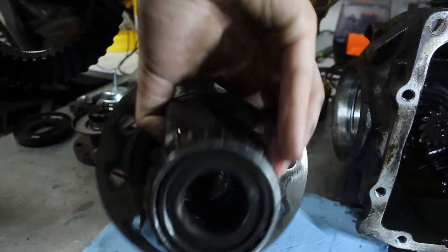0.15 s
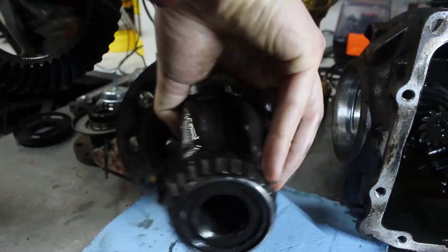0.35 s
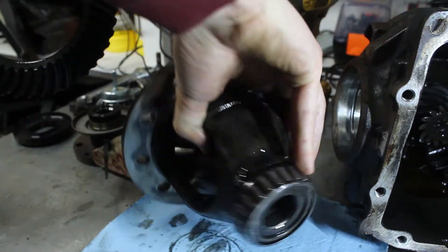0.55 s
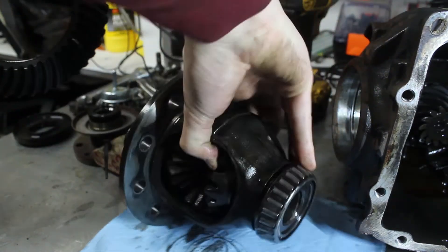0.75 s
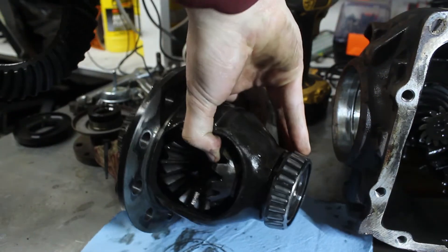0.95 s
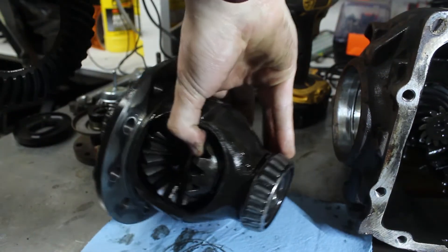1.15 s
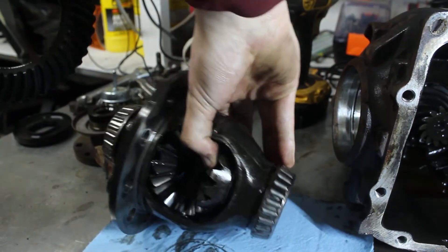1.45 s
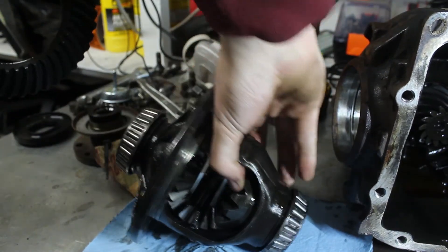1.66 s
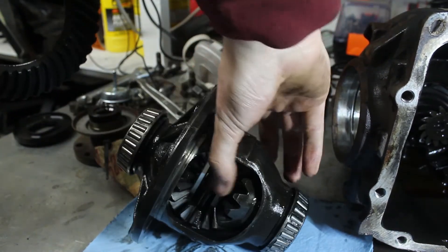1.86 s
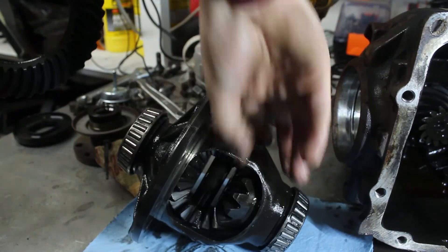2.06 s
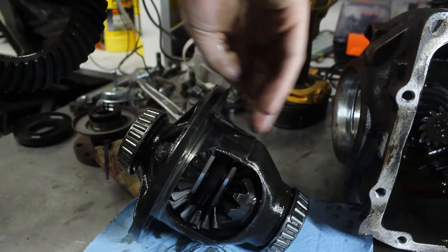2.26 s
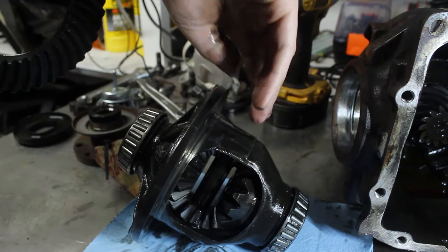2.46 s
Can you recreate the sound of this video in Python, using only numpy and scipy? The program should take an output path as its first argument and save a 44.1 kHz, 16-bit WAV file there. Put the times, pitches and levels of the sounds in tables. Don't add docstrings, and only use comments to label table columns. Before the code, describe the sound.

A heavy metal gear carrier is put down on a workbench. Only faint microphone hiss, hum and thin whines until 0.8 s, then a quick cluster of dull knocks with metallic clatter to 1.0 s. Small ticks follow, a second double thud at 1.4 s, and the loudest clunk at 1.72 s, with rattling gears. A tiny squeak near 1.97 s leads into soft skin rubbing, fading in the short room echo.

```python
import sys
import numpy as np
from scipy import signal
from scipy.fft import rfft, irfft, next_fast_len
from scipy.io import wavfile
from scipy.ndimage import map_coordinates

SR = 44100
rng = np.random.default_rng(int(sys.argv[2]) if len(sys.argv) > 2 else 0)


def to_wav(sig):
    pcm = np.clip(np.atleast_2d(sig), -1, 1) * 32767
    pcm = np.round(pcm).astype(np.int16)
    wavfile.write(sys.argv[1], SR, pcm.T)


def volts_from_decibels(level):
    exponent = np.asarray(level, float) / 20
    return 10 ** exponent


N = 114660

BRIGHT_WET_DB = -5
ATTACK_S = 0.0005


def unit(x):
    return x / np.sqrt(np.mean(x ** 2) + 1e-20)


def along(points, hz):
    f, v = np.transpose(points)
    return np.interp(np.log(hz + 1), np.log(f + 1), v)


def noise(n, response):
    m = next_fast_len(n + SR // 5)
    spectrum = rfft(rng.standard_normal(m)) * response(np.fft.rfftfreq(m, 1 / SR))
    return unit(irfft(spectrum, m)[:n])


def peak(f, center_hz, width_hz):
    return 1j * f * width_hz / (center_hz ** 2 - f * f + 1j * f * width_hz)


def wobble(n, rate_hz):
    return map_coordinates(rng.standard_normal(n // 20 + 9), [np.arange(n) * rate_hz / SR])


def add(track, start_s, x):
    spot = track[round(start_s * SR):][:len(x)]
    spot += x[:len(spot)]


def shop(x, wet_db):
    # (frequency [Hz], t60 [s])
    shop_t60 = [(70, 0.36), (250, 0.57), (1000, 0.5), (3000, 0.48), (8000, 0.12), (14000, 0.23)]
    first_wall_s = 0.006
    hz, t, z = signal.stft(rng.standard_normal(SR * 3 // 4), SR, nperseg=512)
    decay = volts_from_decibels(-60 * t / along(shop_t60, hz)[:, None])
    tail = signal.istft(z * decay, SR, nperseg=512)[1]
    tail = np.pad(tail / np.linalg.norm(tail), (round(first_wall_s * SR), 0)) * volts_from_decibels(wet_db)
    tail[0] = 1
    return signal.fftconvolve(x, tail)


def mic_noise():
    # (frequency [Hz], density [dB per Hz])
    hiss_color = [(15, -41), (25, 6), (86, -8.5), (118, -2.5), (181, -12), (515, -16.5), (1120, -18.5),
                  (6900, -27), (15000, -37)]
    # (frequency [Hz], width [Hz], level [dB])
    whines = [(119, 14, -69), (6900, 130, -72), (9700, 130, -78), (10900, 220, -76), (13000, 100, -81),
              (13800, 100, -81)]
    out = volts_from_decibels(-51 + 0.57 * wobble(N, 5.84)) * noise(N, lambda f: volts_from_decibels(along(hiss_color, f)))
    for center_hz, width_hz, db in whines:
        swell = volts_from_decibels(db + 1.2 * wobble(N, 9.8))
        out += swell * noise(N, lambda f: peak(f, center_hz, width_hz) ** 2)
    return out


def bench():
    # (time [s], level [dB], contact [ms], leg shake [dB], ring share of full t60)
    thuds = [(0.796, -40, 4.5, 16.5, 0.27), (.815, -24, 0.94, -7, 0.41), (0.8764, -19, 1.47, -14.5, 0.28),
             (0.888, -24, 1.1, -13, 0.16), (0.937, -26.5, 0.96, -2, 0.16), (0.949, -21, 1.17, -19, 0.13),
             (0.999, -33, 1.8, -0.5, 0.16), (1.156, -39, 1.8, 1, .4), (1.183, -41, 2.3, -7, 0.13),
             (1.38, -33, 2.7, 11.5, 0.53), (1.3976, -19.5, 0.86, -7, 0.28), (1.43, -26, 1.8, -0.5, 0.21),
             (1.4594, -20.5, 1.25, -15, 0.2), (1.484, -35.5, 1.9, 9, 0.7), (1.50, -45, 1, -6, .3),
             (1.719, -19, 1.5, -6, 0.35), (1.7237, -5.5, 1.46, -6.5, 0.29), (1.764, -33, 0.95, 3, 0.2),
             (1.795, -29, 2.5, -22, 0.24), (1.817, -42, 2.8, -4, 0.64), (1.924, -30, 0.94, -6, 0.14),
             (1.301, -43, 2.1, -8, 0.34), (1.655, -37, 1.2, -11, 0.46)]
    # (frequency [Hz], level [dB], t60 [s])
    bench_modes = [(171, -24, 0.46), (221.4, -6, 0.34), (250.6, -0.5, 0.23), (325.4, 3.5, 0.17),
                   (386.6, -9, 0.38), (463, -5, 0.204), (518, -5.5, 0.28), (672, -14, 0.28),
                   (877, -4.5, 0.32), (1064, 0, 0.11), (1060, -4.5, 0.28), (1405, -18, .2)]
    scatter_db, detune = 2.5, 0.03
    legs_hz, legs_base_db, legs_t60_s = 72.8, -8, 0.14
    spread_s = 0.001
    board = signal.butter(3, 154, "high", fs=SR, output="sos")
    out, t = np.zeros(N), np.arange(SR // 2) / SR
    mode_hz, mode_db, mode_t60_s = np.array(bench_modes).T[:, :, None]
    for start_s, db, contact_ms, legs_db, share in thuds:
        level_draw, pitch_draw = rng.standard_normal((2, len(mode_hz), 1))
        decay = volts_from_decibels(mode_db + scatter_db * level_draw - 60 * t / (mode_t60_s * share))
        tones = np.sin(2 * np.pi * mode_hz * (1 + detune * pitch_draw) * t)
        ring = np.sum(decay * tones, 0) * (1 - np.exp(-t / spread_s))
        push = np.sin(np.pi * np.clip(t[:SR // 50] * 1000 / contact_ms, 0, 1))
        knock = signal.sosfilt(board, signal.fftconvolve(ring, push)[:len(t)])
        knock /= np.abs(knock).max()
        legs = volts_from_decibels(legs_base_db + legs_db - 60 * t / legs_t60_s) * np.sin(2 * np.pi * legs_hz * t)
        add(out, start_s, -volts_from_decibels(db) * shop(knock + legs, -6))
    return out


def gears():
    # (time [s], level [dB], rattle length [s], t60 [s], tilt [dB per octave])
    jolts = [(0.801, -36, 0.033, 0.029, 0.6), (0.8763, -25.5, 0.004, 0.07, -3.5),
             (0.896, -50.5, 0.031, 0.11, 5), (0.937, -36.5, 0.014, .08, -2.5),
             (0.984, -51.5, 0.091, 0.15, 1.5), (1.397, -30.5, 0.011, 0.06, -3.16),
             (1.441, -40, 0.039, 0.078, -5.5), (1.7278, -21, 0.014, .12, -2.2),
             (1.7882, -31, .004, 0.064, -1.9), (1.805, -45.5, .006, 0.2, 0.8),
             (1.948, -43.5, 0.02, .06, -5), (2.0, -58, 0.12, .2, 2), (2.122, -48.5, 0.019, 0.16, -0.9)]
    # (frequency [Hz], density [dB per Hz])
    clatter = [(350, -2), (600, -7), (1220, -15.5), (1390, -14), (1910, -19), (2400, -19.5), (3420, -23.5),
               (9890, -26), (15500, -47)]
    lumps_per_s, lumps_db = 500, 1.8
    crack_db, crack_t60_s = -7.5, 0.023
    out, t = np.zeros(N), np.arange(SR // 3) / SR

    def color(f, tilt_db):
        tilted = volts_from_decibels(along(clatter, f) + tilt_db * np.log2(f / 3000 + 0.055))
        return tilted * f ** 3 / (f ** 3 + 450 ** 3)

    for start_s, db, hold_s, t60_s, tilt_db in jolts:
        body = noise(len(t), lambda f: color(f, tilt_db))
        shape = volts_from_decibels(lumps_db * wobble(len(t), lumps_per_s) - 60 * np.maximum(t - hold_s, 0) / t60_s)
        shape *= 1 + volts_from_decibels(crack_db - 60 * t / crack_t60_s)
        shape *= np.minimum(t / ATTACK_S, 1)
        add(out, start_s, volts_from_decibels(db) * shop(body * shape, BRIGHT_WET_DB))
    return out


def rollers():
    tick_times_s = [.859, .860, .865, .879, .940, .9748, .9752, 1.0497, 1.169, 1.224, 1.2242, 1.24, 1.284,
                    1.445, 1.4818, 1.546, 1.722, 1.949, 1.981, 1.3975, 1.7866, 1.731, 1.45, .889]
    # (level [dB], pitch [Hz], t60 [s])
    ticks = [(-32.5, 9100, 0.069), (-38, 3900, 0.028), (-52.5, 5800, 0.66), (-38, 2160, 0.084),
             (-44, 2600, 0.08), (-37, 9300, 0.016), (-37, 5360, 0.034), (-40, 9900, 0.036),
             (-54.5, 6700, 0.047), (-47, 4600, 0.024), (-56, 8800, .02), (-58, 3900, 0.092),
             (-40.5, 780, 0.028), (-61, 9900, .1), (-48, 9500, .05), (-52, 9600, .03), (-41, 7500, 0.016),
             (-36, 1000, 0.062), (-52, 11500, 0.028), (-46, 6000, 0.012), (-35.5, 4700, 0.024),
             (-29.5, 1000, .2), (-42, 1010, .15), (-36, 1450, 0.069)]
    out, t = np.zeros(N), np.arange(SR // 4) / SR

    def color(f, pitch_hz):
        ring = np.abs(peak(f, pitch_hz, 0.16 * pitch_hz))
        click = np.abs(peak(f, pitch_hz, 0.43 * pitch_hz)) ** 2
        return ring + volts_from_decibels(-10) * click

    for start_s, (db, pitch_hz, t60_s) in zip(tick_times_s, ticks):
        body = noise(len(t), lambda f: color(f, pitch_hz))
        shape = volts_from_decibels(-60 * t / t60_s) * np.minimum(t / ATTACK_S, 1)
        add(out, start_s, volts_from_decibels(db) * shop(body * shape, BRIGHT_WET_DB))
    return out


def thumb():
    # (time [s], level [dB])
    drag = [
        (1.93, -68),
        (1.95, -43.5),
        (2.03, -51),
        (2.15, -47.5),
        (2.3, -50.5),
        (2.45, -55.5),
        (2.6, -57.5),
    ]
    # (frequency [Hz], width [Hz], level [dB])
    casting = [(235, 41, -1.5), (415, 109, -7), (672, 41, 5.5), (950, 76, -6), (1670, 250, -12.5),
               (2013, 69, -7.5), (2850, 330, -18.5), (7500, 4800, -29.5)]
    squeak_s, squeak_hz, squeak_db, squeak_long_s = 1.966, 1556.5, -31, 0.0086
    t = np.arange(N) / SR

    def cavity(f):
        return sum((-1) ** k * volts_from_decibels(db) * peak(f, c, w) for k, (c, w, db) in enumerate(casting))

    pressure_db = np.interp(t, *np.transpose(drag), left=-120)
    rub = noise(N, cavity) * volts_from_decibels(pressure_db + 1.05 * wobble(N, 29.76))
    tone = np.sin(2 * np.pi * squeak_hz * t)
    rasp = 0.27 * noise(N, lambda f: peak(f, squeak_hz, 260) ** 2)
    squeak = np.exp(-((t - squeak_s) / squeak_long_s) ** 2) * (tone + rasp)
    return rub + volts_from_decibels(squeak_db) * shop(squeak, -18.5)[:N]


def scene():
    return (mic_noise() + bench() + gears() + rollers() + thumb())[None]


def roll_off(x):
    return signal.sosfilt(signal.butter(12, 16420, fs=SR, output="sos"), x)


def record(dry):
    mix = signal.sosfilt(signal.butter(2, 45, "high", fs=SR, output="sos"), dry)
    mix = signal.sosfilt(signal.butter(3, 13200, fs=SR, output="sos"), mix)
    mix = signal.sosfilt(signal.cheby2(14, 50, 15650 * 1.03, fs=SR, output="sos"), mix)
    return roll_off(mix)


dry = scene()
out = record(dry)
to_wav(out)
```